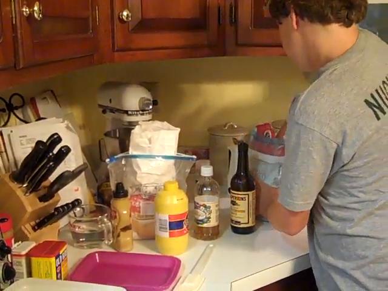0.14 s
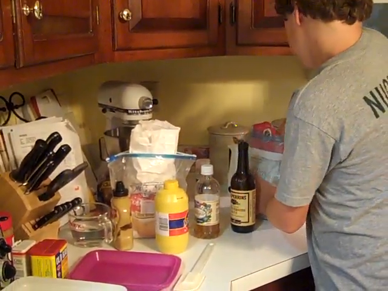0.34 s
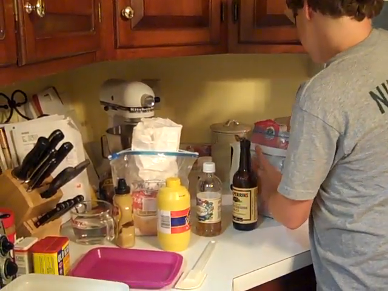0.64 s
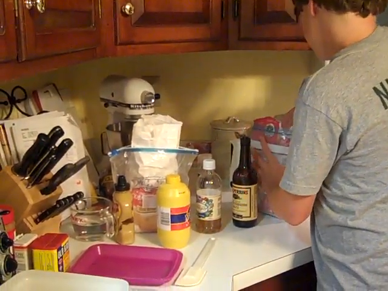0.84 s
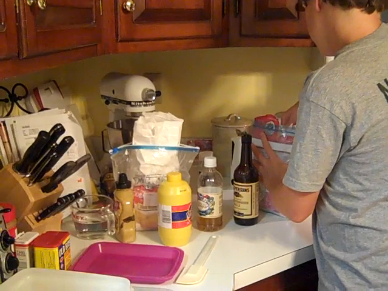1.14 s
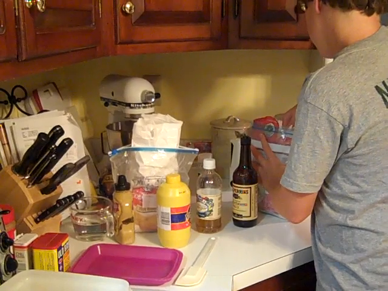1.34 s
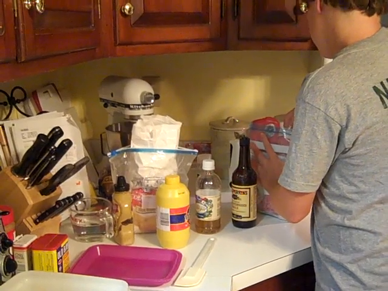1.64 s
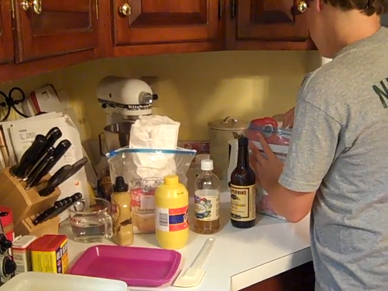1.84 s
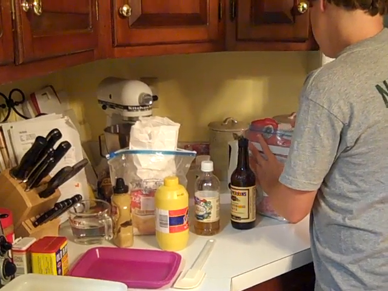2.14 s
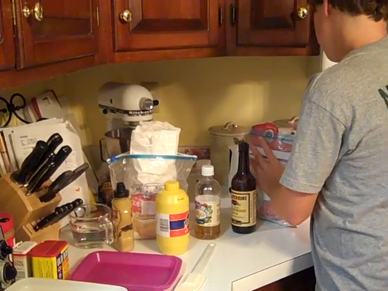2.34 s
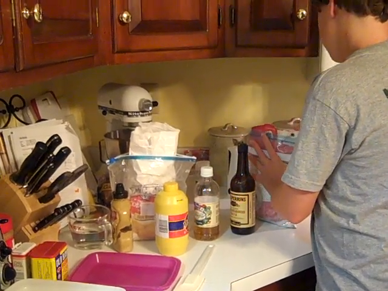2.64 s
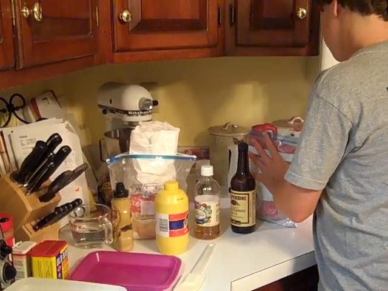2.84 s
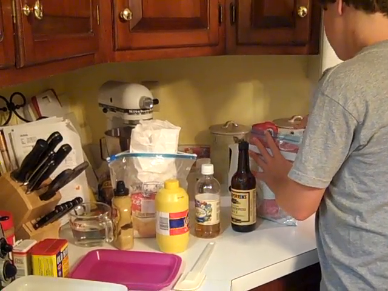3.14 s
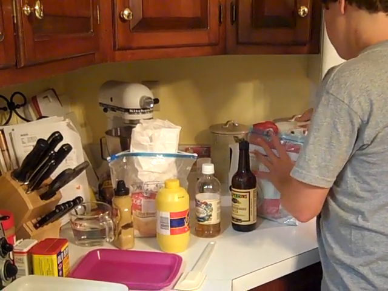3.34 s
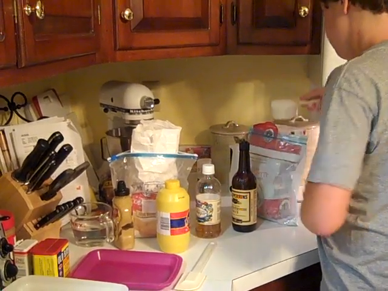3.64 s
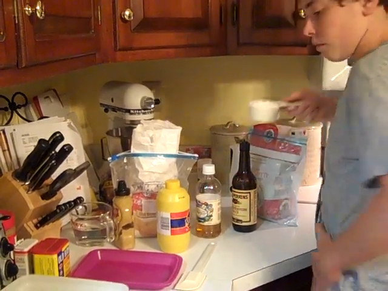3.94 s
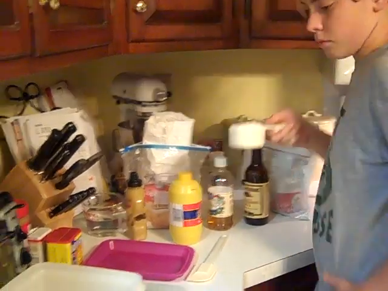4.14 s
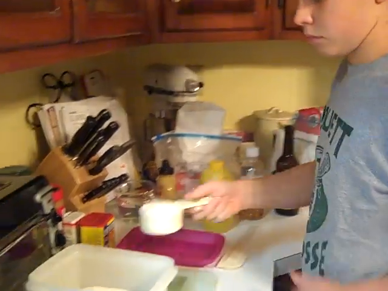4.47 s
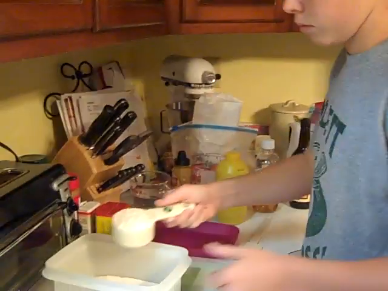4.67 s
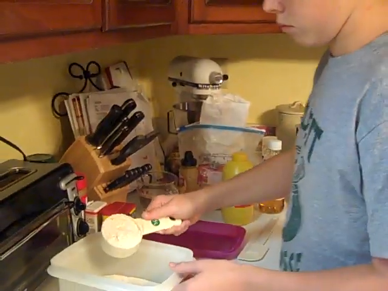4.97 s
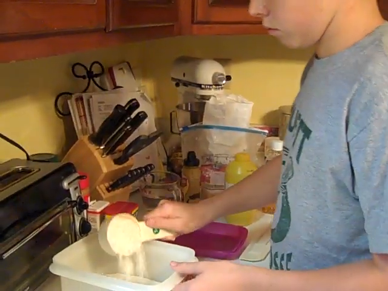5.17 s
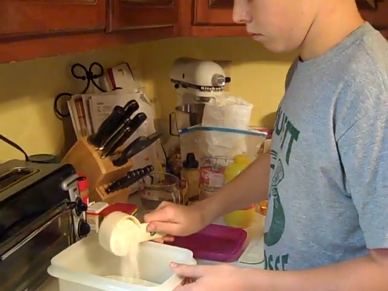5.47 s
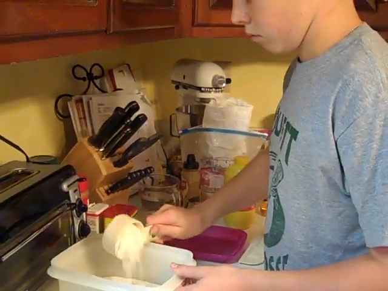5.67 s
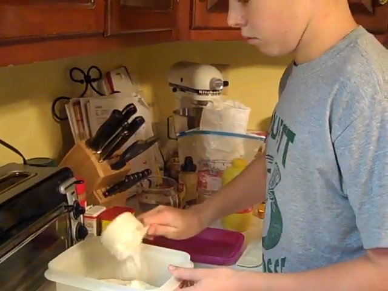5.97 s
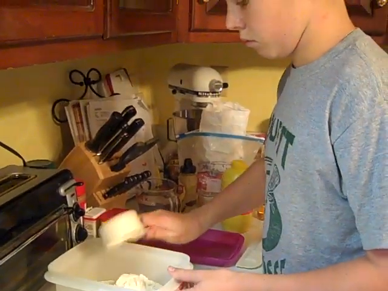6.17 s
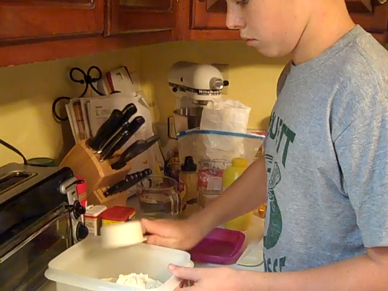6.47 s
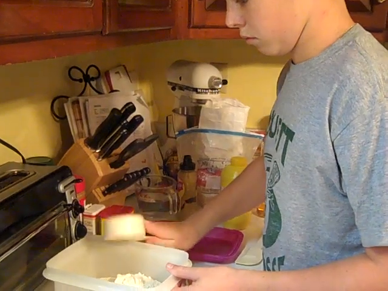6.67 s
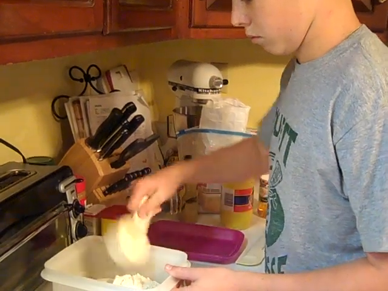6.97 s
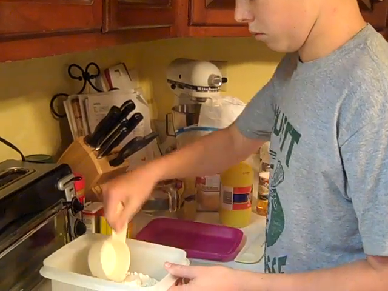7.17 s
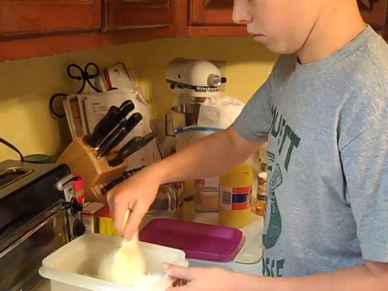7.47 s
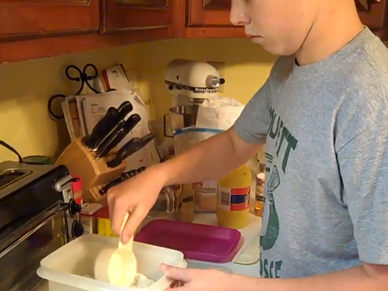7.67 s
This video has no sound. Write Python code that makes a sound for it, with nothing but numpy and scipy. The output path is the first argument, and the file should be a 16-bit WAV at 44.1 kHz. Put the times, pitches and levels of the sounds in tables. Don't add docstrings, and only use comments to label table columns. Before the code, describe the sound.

A plastic bag of flour rustles and snaps under a digging cup, then a hard plastic cup knocks sharply on a plastic tub in a kitchen.

```python
import sys
import numpy as np
from scipy import signal
from scipy.fft import rfft, irfft, next_fast_len
from scipy.io import wavfile
from scipy.ndimage import map_coordinates

SR = 44100
rng = np.random.default_rng(int(sys.argv[2]) if len(sys.argv) > 2 else 0)


def waveform_to_disk(signal):
    frames = np.transpose(np.atleast_2d(signal))
    scaled = np.clip(frames, -1, 1) * 32767
    samples = np.round(scaled).astype(np.int16)
    wavfile.write(sys.argv[1], SR, samples)


def elevation(decibels):
    levels = np.asarray(decibels, float)
    return 10 ** (levels / 20)


N = 344421

# time_s, effort_db
HAND_EFFORT = [(0, -42), (.1, -43), (.25, -41), (.43, -37.5), (.55, -43), (.79, -43.5), (.92, -43),
               (1.28, -39), (1.48, -43.5), (1.78, -40), (2.0, -39), (2.32, -42.5), (2.45, -43),
               (2.69, -44.5), (3.0, -46.5), (3.15, -53), (3.28, -48), (3.4, -56)]
# push_s, length_s, depth_db
PAUSES = [(.12, .06, 5), (.275, .06, 3), (.642, .06, 14), (1.015, .05, 12), (1.6, .08, 9), (1.69, .04, 8),
          (1.805, .04, 14), (1.975, .05, 14), (2.51, .08, 12), (2.6, .05, 7), (2.88, .05, 4)]
# start_s, film_peak_db, crinkle_over_film_db, weight_over_film_db, t60_s
SNAPS = [(.0251, -25, -4, -20, .04), (.1537, -32, -1, -18, .025), (.2239, -39, 1, -3, .043),
         (.2803, -25.5, 4, -22, .07), (.4813, -34, 8, -14, .034), (.646, -42, -12, 8, .039),
         (1.0212, -21.5, -12, -4, .03), (1.6274, -34, 11, 0, .04), (1.694, -24, -9, -14, .057),
         (1.8092, -10, 0.1, -6, .03), (2.5159, -32, 8, -7, .055), (4.5108, -40, 3, -10, .017)]
# start_s, film_peak_db, crinkle_over_film_db, weight_over_film_db
CRUMPLES = [(.1274, -41, 10, -12), (.3486, -38, 7, -8), (.4014, -34, -1, -7), (.6708, -30, -2, 4),
            (.742, -35, -12, -8), (.8275, -30, -6, 3), (1.0374, -32, 4, -1), (1.0859, -34, -14, -14),
            (1.1244, -35, -3, -6), (1.145, -39, 12, -11), (1.1822, -35, 7, -11), (1.2227, -30, -8, 1),
            (1.2976, -36, 5, -10), (1.36, -36.5, 2, -8), (1.4676, -37.5, -3, -5), (1.498, -43, -14, 4),
            (1.5774, -35, -11, -20), (1.6072, -39, -1, -13), (1.7535, -25, -6, -15), (1.861, -37, -2, -4),
            (2.0686, -50, 3, 14), (2.375, -37, -1, -3), (2.6055, -29, -6, -15), (2.6857, -34, 1, -10),
            (2.7794, -52, 8, 7), (2.8854, -41, -2, -2), (3.0694, -41.5, -2, -18), (3.1852, -43, -10, -20)]
# peak_s, half_length_s, swish_db, fine_hiss_over_swish_db
SWISHES = [(3.365, .06, -45, 4), (3.46, .045, -48, -2), (3.78, .07, -54, 4), (3.98, .3, -63, 8),
           (4.53, .045, -56, 3), (4.66, .07, -57, 5), (4.8, .12, -46, -2), (5.02, .045, -60, 9),
           (7.23, .03, -62, 6), (7.4, .07, -70, 13), (7.53, .04, -65, 3), (7.665, .03, -75, 19)]
FILM_DB, CRINKLE_DB, WEIGHT_DB = -3.5, -1.3, -6
WEIGHT_GROWS, USUAL_DB = .8, -42
SNAP_RISE_S, CRUMPLE_RISE_S, CRUMPLE_T60_S = .0013, .0075, .06
SWISH_FADE_DB = 18

# pitch_hz, level_db_per_hz
AIR = [(20, -19), (60, -2.5), (120, -2), (160, -5), (290, 5.5), (400, -0.5), (500, -4), (750, -5),
       (1100, -11), (2200, -20), (2800, -21), (5000, -28), (9000, -29.5), (15000, -18)]
AIR_DB = -48.5
# pitch_hz, level_db
HUM = [(119.5, -57.5), (241, -59), (291, -65), (369, -59), (743, -62), (2842, -82), (6584, -84),
       (7768, -92)]
# start_s, level_db, pitch_hz
FOOTSTEP = (4.37, -39, 34)
# pitch_hz, likeness
ALIKE = [(60, 1), (130, 0.62), (290, 0.97), (640, 0.89), (1400, 0.59), (3090, 0.11), (6800, -0.75),
         (15000, -0.55)]
# pitch_hz, t60_s
KITCHEN_DECAY = [(60, 0.71), (160, 0.63), (420, 0.4), (1100, 0.46), (2910, 0.5), (7680, 0.32)]

# start_s, level_db, pitch_hz
DIGS = [
    (.674, -17.5, 727),
    (.831, -19, 690),
    (1.022, -14.5, 740),
    (1.225, -21, 680),
]
# pitch_ratio, level_db, t60_s
PACKED_BAG = [(.27, -11, .08), (.41, -15, .05), (.72, -11, .05), (.86, -7, .047), (1, 0, .035),
              (1.5, -7, .03)]
# start_s, level_db, outer_modes_share_db
NUDGES = [
    (1.755, -25, -10),
    (1.809, -7.5, 1.5),
    (2.781, -28, -16),
]
# pitch_hz, level_db, t60_s
LID = [(431, -6.5, .055), (825, -7.5, .055), (1796, 0, .024)]
# start_s, level_db, from_hz, to_hz, glide_s, t60_s
SQUEAK = (2.888, -33, 2050, 2750, .012, .008)

# peak_s, half_length_s, level_db, low_hz, high_hz
RUB = (4.78, .13, -57, 1780, 1960)
# start_s, knock_peak_db, knock_hz, crack_db, cup_ring_db
TAPS = [(5.1309, -3, 750, -29, -40), (5.156, -5.5, 766, -24.5, -36), (5.347, -3.5, 794, -24.5, -45),
        (5.497, -16, 760, -53, -75), (5.726, -1, 792, -18.5, -34), (5.906, -1, 798, -19, -49),
        (6.0938, -1.2, 800, -15, -42), (6.2894, 0.1, 780, -13.5, -28), (6.505, 1.5, 717, -4, -16),
        (6.7264, 3, 770, -3, -15), (7.1084, -2.5, 820, -31, -21)]
# start_s, peak_db, t60_s
REBOUNDS = [
    (5.1644, -23, 0.005),
    (5.1901, -28, 0.022),
    (5.3901, -25, 0.005),
    (5.5114, -45, 0.0099),
    (5.7663, -19.5, 0.015),
    (5.9469, -19.5, 0.005),
    (5.9544, -21.5, 0.015),
    (6.1294, -33, 0.022),
    (6.323, -25.5, 0.022),
    (6.544, -17, 0.0092),
]
# pitch_hz, level_db_per_hz
TUB = [(40, -34), (120, -7), (250, -6.5), (450, -2), (700, 0), (1100, -5), (1500, -10), (2200, -14.5),
       (5000, -35), (12000, -56)]
# pitch_hz, level_db, t60_s
WALL_MODES = [(638.4, 4, 0.076), (1082, -9, 0.32)]
# pitch_hz, level_db, t60_s
CUP = [(1897, 0, .07), (1905, -13, .2), (1560, -11, .08), (3430, -12, .06), (3710, -15, .03),
       (4150, -6, .012)]
# pitch_hz, level_over_crack_db, t60_s, share_the_room_hears_db
RIM = (4150, 7.5, .006, -7)
DULL_DB = 14
THUMP_DB, THUMP_GROWS = -20, .55

# cavity_hz, cavity_width_hz, duct_hz, duct_width_hz
PORTS = [(7800, 1650, 12500, 20400), (6695, 1630, 6330, 8300)]
HISS_DB = -66.5
TOP_HZ = 14250


def unit(x):
    return x / np.sqrt(np.mean(x ** 2) + 1e-20)


def along(points, hz):
    f, v = np.transpose(points)
    return np.interp(np.log(hz + 1), np.log(f + 1), v)


def curves(rows):
    s, *cols = np.transpose(rows)
    t = np.arange(N) / SR
    return np.array([np.interp(t, s, c, left=-120, right=-120) for c in cols])


def wobble(rate):
    at = np.arange(0, N + 32, 32)
    knots = rng.standard_normal(int(N * rate / SR) + 4)
    return np.interp(np.arange(N), at, map_coordinates(knots, [at * rate / SR]))


def filtered(x, response):
    m = next_fast_len(x.shape[-1] + 8192)
    return irfft(rfft(x, m) * response(np.fft.rfftfreq(m, 1 / SR)), m)[..., :x.shape[-1]]


def band(x, lo_hz, hi_hz):
    sos = signal.butter(2, [lo_hz, min(hi_hz, SR / 2.1)], "bandpass", fs=SR, output="sos")
    return signal.sosfilt(sos, x)


def diffuse(pair):
    turn = lambda hz: np.arccos(np.clip(along(ALIKE, hz), -1, 1)) / 2
    both = filtered(pair, lambda hz: np.array([np.cos(turn(hz)), np.sin(turn(hz))]))
    mid, side = both[..., 0, :], both[..., 1, :]
    return np.stack([mid + side, mid - side], axis=-2)


def add(track, s, sound):
    start = round(s * SR)
    part = track[..., start:start + sound.shape[-1]]
    part += sound[..., :part.shape[-1]]


def passing(half):
    return elevation(-SWISH_FADE_DB * np.linspace(-2, 2, round(4 * half * SR)) ** 2)


def creases(density, spread_db):
    chance = rng.random(N)
    size = np.minimum(rng.exponential(1, N), 3.5)
    sign = rng.standard_normal(N)
    pops = chance < density / SR * elevation(4.5 * wobble(40))
    return unit(pops * sign * elevation(spread_db * size))


def bag():
    effort_db, = curves(HAND_EFFORT)
    for s, length, depth_db in PAUSES:
        add(effort_db, s - length, -depth_db * np.linspace(0, 1, round(length * SR)) ** .6)
    flour_db = USUAL_DB + WEIGHT_GROWS * (effort_db - USUAL_DB) + WEIGHT_DB
    layers_db = np.array([effort_db + FILM_DB, effort_db + CRINKLE_DB, flour_db])
    force = elevation(layers_db + 1.7 * wobble(24.88))

    for s, half, db, fine_db in SWISHES:
        add(force[:2], s - 2 * half, elevation(db + np.array([[0], [fine_db]])) * passing(half))

    t = np.arange(SR // 4) / SR
    folds = [(*row, SNAP_RISE_S) for row in SNAPS]
    folds += [(*row, CRUMPLE_T60_S, CRUMPLE_RISE_S) for row in CRUMPLES]
    for s, db, crinkle_db, weight_db, t60, rise in folds:
        swell = (1 - np.exp(-(t / rise) ** 2)) * elevation(-60 * t / max(t60, .004))
        burst_db = db + np.array([[-3], [crinkle_db - 2.5], [weight_db + 1.5]])
        add(force, max(s - 0.58 * rise, 0), elevation(burst_db) * swell / swell.max())

    shared = creases(9000, spread_db=3.5)
    own = [creases(5000, spread_db=2.5) for _ in force]
    edges_hz = [(1480, 3300), (3350, 14800), (250, 1100)]
    out = np.zeros(N)
    for push, pops, edge in zip(force, own, edges_hz):
        gain = 1 / np.std(band(shared, *edge))
        out += gain * band(push * (0.35 * shared + 0.89 * pops), *edge)
    return out


def background():
    t = np.arange(N) / SR
    air = unit(filtered(diffuse(rng.standard_normal((2, N))), lambda hz: elevation(along(AIR, hz))))
    tones = np.zeros(N)
    for hz, db in HUM:
        tones += elevation(db + 2.1 * wobble(5.3)) * np.sin(2 * np.pi * hz * t + 0.74 * wobble(12))
    step = np.zeros(N)
    s, db, hz = FOOTSTEP
    add(step, s, elevation(db - 60 * t / 0.14) * np.sin(2 * np.pi * hz * t))
    drift_db = .6 * wobble(4)
    return elevation(AIR_DB + drift_db) * air + tones + step


def kitchen(x):
    out, step = np.zeros((2, N)), SR // 6
    parts = np.pad(x, (0, -N % step)).reshape(-1, 1, step)
    noise = rng.standard_normal((len(parts), 2, SR // 2)).astype(np.float32)
    hz, t, z = signal.stft(noise, SR, nperseg=256)
    decay = elevation(-60 * t / along(KITCHEN_DECAY, hz)[:, None]).astype(np.float32)
    tails = diffuse(signal.istft(z * decay, SR, nperseg=256)[1])
    tails = tails / np.linalg.norm(tails[:, :1], axis=2, keepdims=True)
    wet = signal.fftconvolve(parts, tails, axes=2)
    for k, answer in enumerate(wet):
        add(out, k * step / SR + .005, answer)
    return out


def canister():
    out, t = np.zeros(N), np.arange(SR // 4) / SR
    soft = 1 - np.exp(-t / 0.00067)
    mode = lambda hz, db, t60: soft * elevation(db - 60 * t / t60) * np.sin(2 * np.pi * hz * t)
    for s, db, hz in DIGS:
        for ratio, level_db, t60 in PACKED_BAG:
            add(out, s, mode(ratio * hz, db + level_db, t60))
    for s, db, outer_db in NUDGES:
        for (hz, level_db, t60), share_db in zip(LID, (outer_db, 0, outer_db)):
            add(out, s, mode(hz, db + level_db + share_db, t60))
    s, db, from_hz, to_hz, glide, t60 = SQUEAK
    pitch = np.interp(t, [0, glide], [from_hz, to_hz])
    fade = elevation(db - 60 * np.maximum(t - glide, 0) / t60)
    add(out, s, soft * fade * np.sin(2 * np.pi * np.cumsum(pitch) / SR))
    return out


def rub():
    s, half, db, lo_hz, hi_hz = RUB
    out, swell = np.zeros(N), passing(half)
    friction = unit(band(rng.standard_normal(len(swell)), lo_hz, hi_hz))
    add(out, s - 2 * half, elevation(db) * swell * friction)
    return out


def ring(modes, t, scatter_db):
    out = np.zeros(len(t))
    for hz, db, t60 in modes:
        out += elevation(db + rng.normal(0, scatter_db) - 60 * t / t60) * np.sin(2 * np.pi * hz * t)
    return out


def crack(t, swell, lo_hz, hi_hz):
    noisy = band(swell * rng.standard_normal(len(t)), lo_hz, hi_hz)
    click = np.linalg.norm(swell) * band(1.0 * (t == 0), lo_hz, hi_hz)
    return np.array([noisy, click])


def taps():
    out, t = np.zeros((2, N)), np.arange(SR // 2) / SR
    onset = np.minimum(t / 0.0015, 1) ** 3
    for s, knock_db, hz, crack_db, cup_db in TAPS:
        late = np.maximum(t - .0015, 0)
        softness = np.clip((knock_db - crack_db) / 30, 0, 1)
        touch = np.clip(late * hz / (3.29 + 2.5 * softness), 0, 1)
        push = np.sin(np.pi * touch ** (0.36 + 0.3 * softness ** 4)) ** 2
        wall = -push * np.sin(2 * np.pi * hz * late)
        sound = elevation(knock_db + 0.5 + np.array([[0], [-4.5]])) * wall

        thump = elevation(-60 * t / .25) * unit(band(rng.standard_normal(len(t)), 31, 222))
        sound += onset * elevation(THUMP_DB + THUMP_GROWS * crack_db) * thump

        tub_noise = unit(filtered(rng.standard_normal(len(t)), lambda f: elevation(along(TUB, f))))
        shudder_db = knock_db - 10.5 - 4.5 * softness + np.array([[0], [-2.5]])
        sound += onset * elevation(shudder_db) * elevation(-60 * t / 0.1) * tub_noise
        sound += onset * elevation(knock_db - 24.5) * ring(WALL_MODES, t, scatter_db=3.5)

        grip = elevation(2.5 * map_coordinates(rng.standard_normal(60), [t * 90]))
        octave_loss_db = DULL_DB * softness
        cup_modes = [(f, db - octave_loss_db * np.log2(f / CUP[0][0]), t60) for f, db, t60 in CUP]
        sound += onset * grip * elevation(cup_db + np.array([[4], [0]])) * ring(cup_modes, t, scatter_db=1)

        rim_hz, rim_db, rim_t60, room_db = RIM
        chirp_db = crack_db + rim_db + np.array([[0], [room_db]]) - 60 * t / rim_t60
        sound += onset * elevation(chirp_db) * np.sin(2 * np.pi * rim_hz * t)
        swell = onset * (elevation(3 - 60 * t / .008) + elevation(-20.5 - 60 * t / 0.027))
        add(out, s - .0012, sound + elevation(crack_db + 9) * crack(t, swell, 1600, 9500))

    for s, db, t60 in REBOUNDS:
        swell = elevation(-60 * t / t60) + elevation(-10 - 60 * t / 0.065)
        add(out, s, elevation(db - 3) * crack(t, swell, 2000, 8000))
    return out


def scene():
    far = bag() + canister()
    near, spread = taps()
    room = kitchen(elevation(-7) * far + elevation(-7.5) * spread)
    return elevation(-4) * far + near + room + background() + rub()


def top_cut(x):
    return signal.sosfilt(signal.butter(12, 15550, fs=SR, output="sos"), x)


def record(dry):
    low = lambda f, c, w: c * c / (c * c - f * f + 1j * f * w)
    ports = lambda f: np.array([low(f, c, w) * low(f, d, v) for c, w, d, v in PORTS])
    x = filtered(dry, ports)
    x = x + elevation(HISS_DB) * rng.standard_normal(x.shape)
    bass_hz = np.array([[45], [12]])
    x = filtered(x, lambda f: elevation([[-.8], [0]]) * 1j * f / (bass_hz + 1j * f) * (f < TOP_HZ))
    clipped = x / (1 + np.abs(x) ** 8) ** (1 / 8)
    return top_cut(clipped)


dry = scene()
out = record(dry)
waveform_to_disk(out)
```